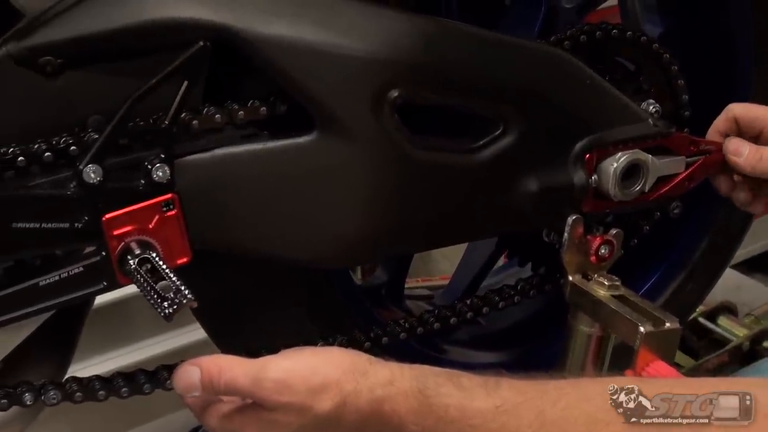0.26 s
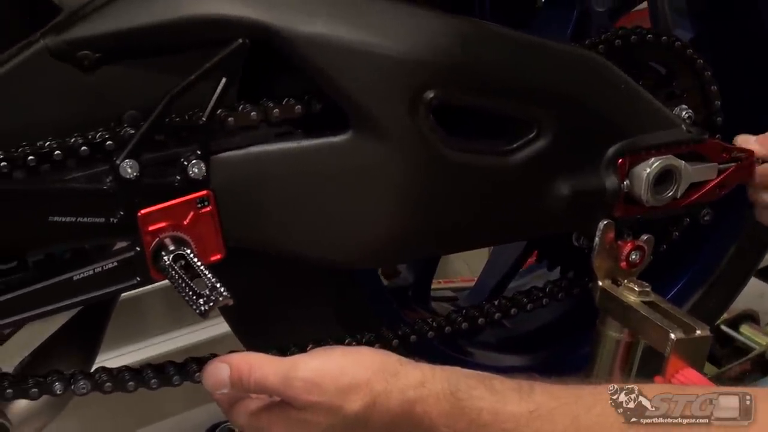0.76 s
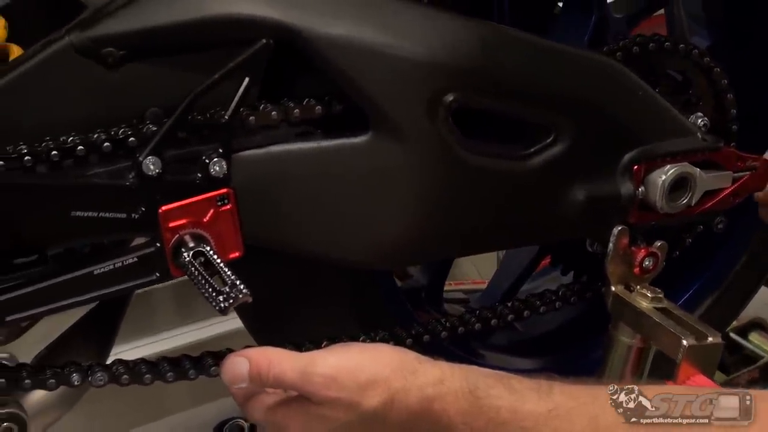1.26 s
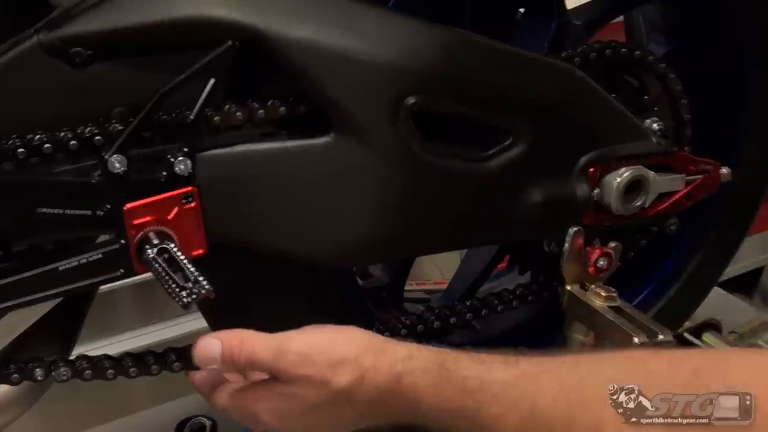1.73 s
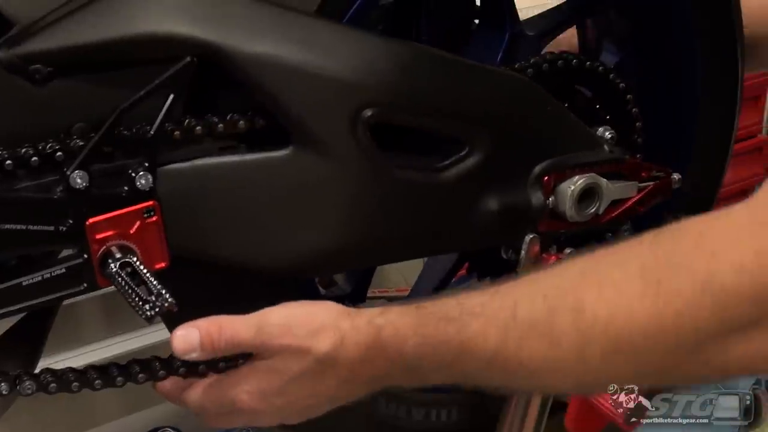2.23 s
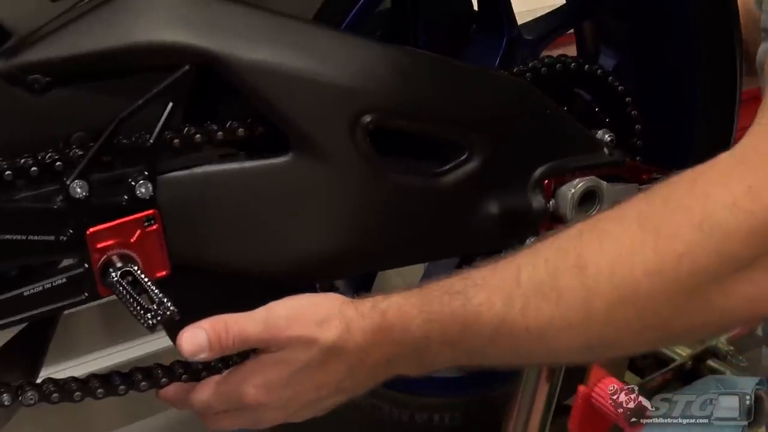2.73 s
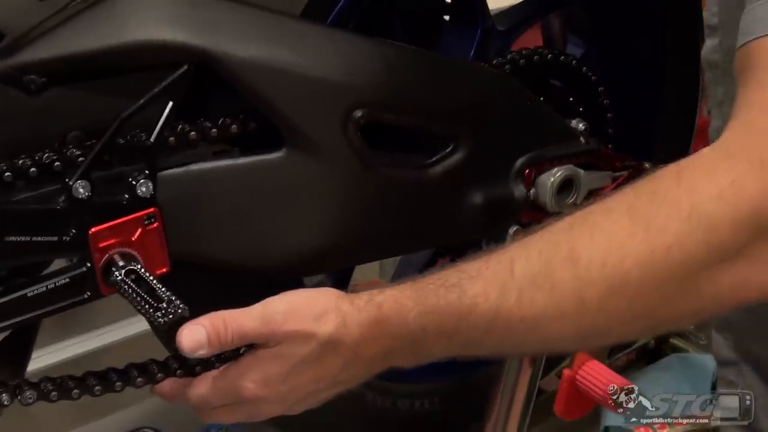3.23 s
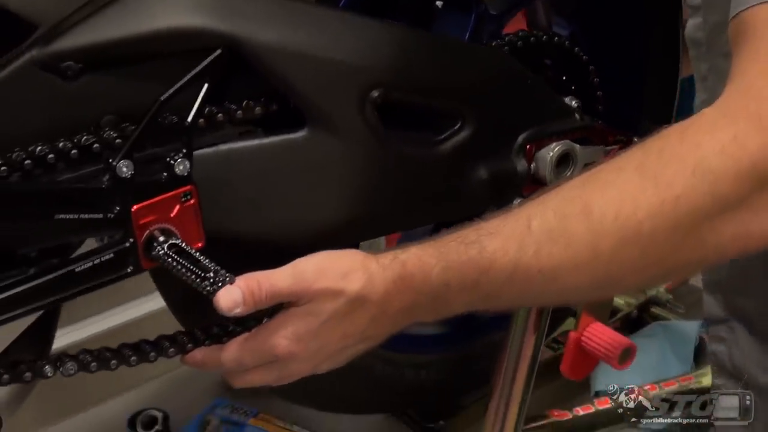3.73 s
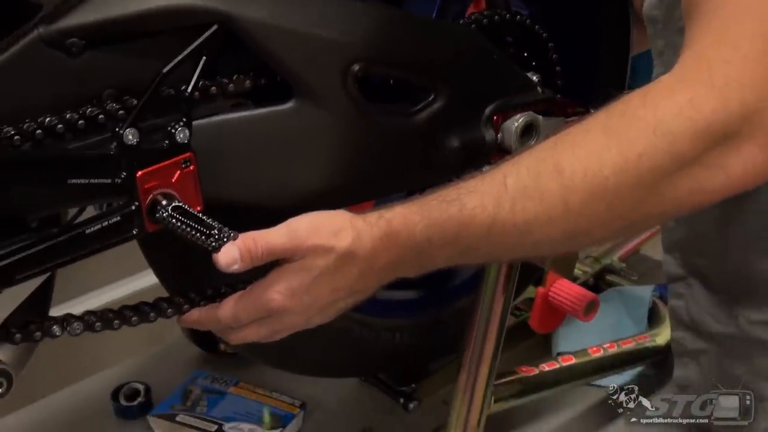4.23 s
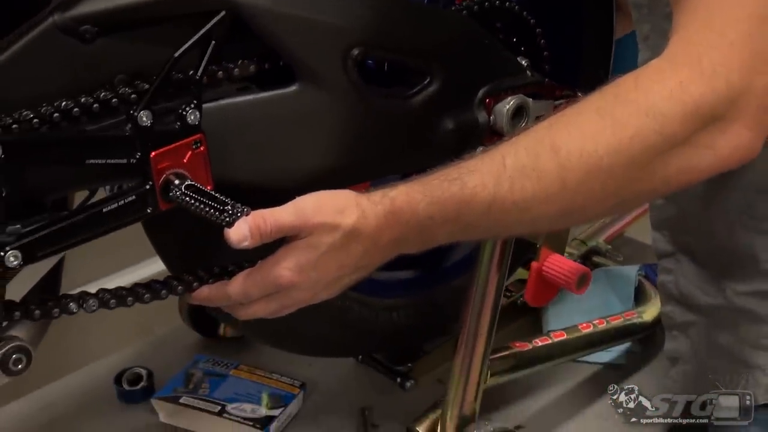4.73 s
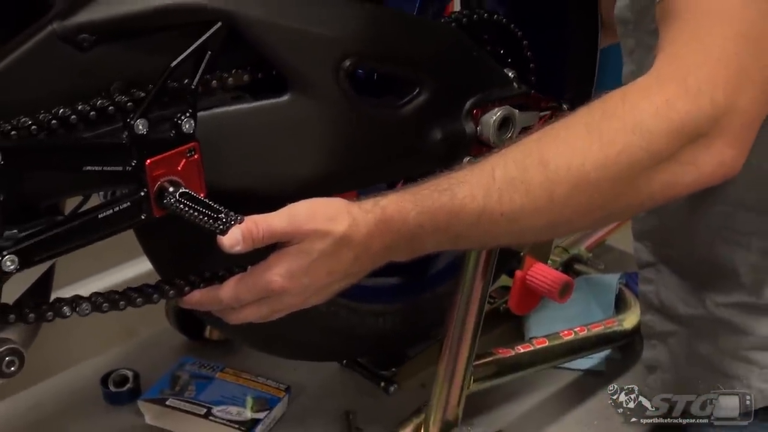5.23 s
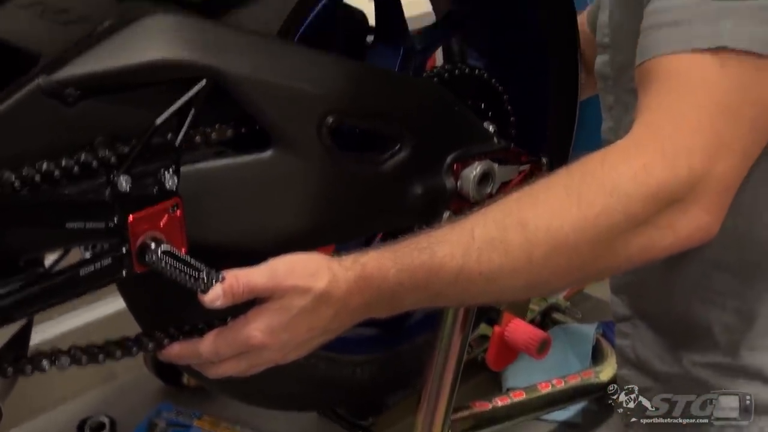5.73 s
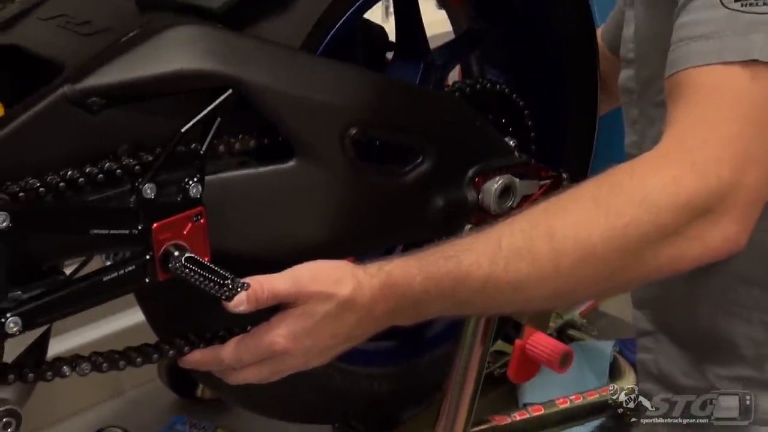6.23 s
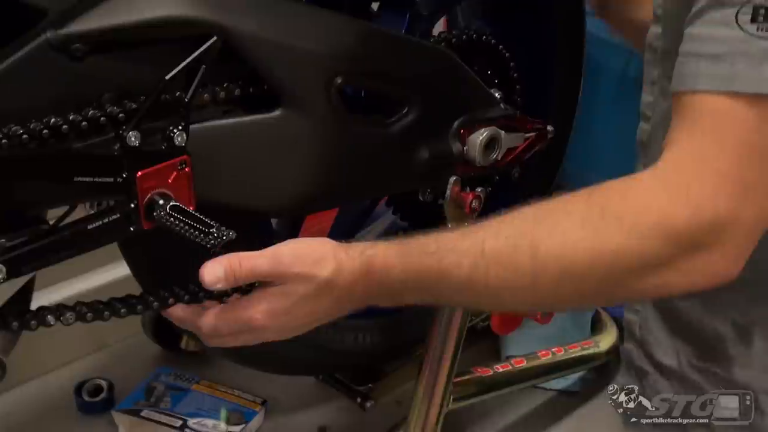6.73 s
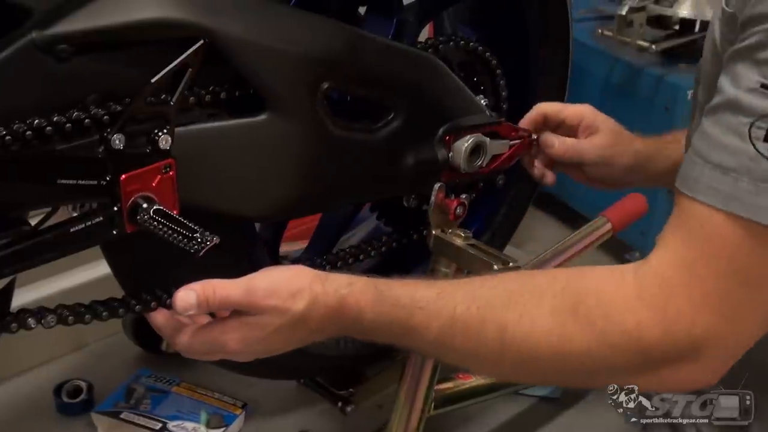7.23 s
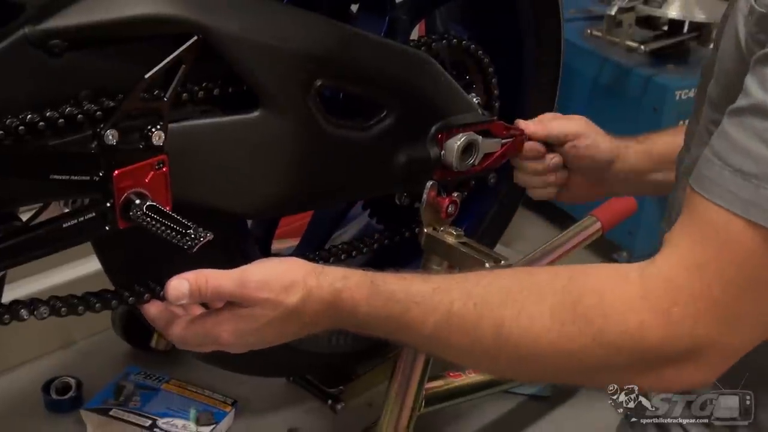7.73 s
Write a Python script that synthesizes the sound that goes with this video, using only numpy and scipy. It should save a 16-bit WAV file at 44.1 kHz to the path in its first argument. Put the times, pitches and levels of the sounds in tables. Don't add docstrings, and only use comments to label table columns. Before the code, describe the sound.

Sharp metallic ratchet snaps, then cloth rustle, paired chain and axle clacks, and three softer snaps, ringing in a large hard-walled workshop over low rumble.

```python
import sys
import numpy as np
from scipy import signal
from scipy.fft import rfft, irfft, next_fast_len
from scipy.io import wavfile
from scipy.ndimage import uniform_filter1d, map_coordinates

SR = 44100
rng = np.random.default_rng(int(sys.argv[2]) if len(sys.argv) > 2 else 0)


def level_to_linear(level):
    exponent = np.asarray(level, float) / 20
    return 10 ** exponent


def pcm_store(signal):
    levels = np.round(np.clip(np.atleast_2d(signal), -1, 1) * 32767)
    wavfile.write(sys.argv[1], SR, levels.astype(np.int16).T)


N = 351477

# (time [s], blow energy [dB], low ring [dB], brightness [dB], chatter t60 [s])
SHOVE_BLOWS = [
    (3.5402, 7, -23, -19, 0.016),
    (3.7296, 6.5, -20, -17, 0.02),
    (5.3096, 6.5, -17.5, -17.5, 0.025),
    (5.4997, 7.5, -21.5, -19.5, 0.015),
    (5.7160, -40, -12, -14.5, 0.044),
    (6.0918, 5.5, -19, -16.5, 0.022),
    (6.1979, 8, -17, -16, 0.017),
    (6.2960, -9.5, -16.5, -40, .013),
]
# (time [s], blow energy [dB], low ring [dB], brightness [dB], chatter t60 [s])
STAND_BLOWS = [
    (4.488, 4.9, -17.5, -19, 0.035),
    (4.5520, 1.7, -11.5, -13.5, 0.026),
]


def unit(x):
    return x / np.sqrt(np.mean(x ** 2) + 1e-20)


def along(points, hz):
    f, v = np.transpose(points)
    return np.interp(np.log(hz + 1), np.log(f + 1), v)


def wobble(rate):
    knots = rng.standard_normal(int(N * rate / SR) + 4)
    return map_coordinates(knots, [np.arange(N) * rate / SR])


def filtered(x, response):
    m = next_fast_len(len(x) + 8192)
    return irfft(rfft(x, m) * response(np.fft.rfftfreq(m, 1 / SR)), m)[:len(x)]


def noise(spectrum):
    return unit(filtered(rng.standard_normal(N), lambda hz: level_to_linear(along(spectrum, hz))))


def decay(since, build_s, t60):
    return (1 - np.exp(-(since / build_s) ** 2)) * level_to_linear(-60 * since / t60)


def burst(envelope, colour):
    n = len(envelope)
    spikes = rng.standard_normal(n) * level_to_linear(2.5 * rng.standard_normal(n))
    z = rfft(envelope * spikes)
    even = np.sqrt(np.abs(uniform_filter1d(np.abs(z) ** 2, size=60))) + 1e-12
    sound = irfft(z / even * colour, n)
    sound = sound * np.minimum(1, 8 * np.sqrt(envelope) + (np.cumsum(envelope) > 1))
    sound[n * 7 // 8:] = 0
    return sound / np.linalg.norm(sound)


def damped_body(modes, f):
    spot_db = rng.normal(0, 2.5, len(modes))
    response = 0
    for k, (centre, width, peak_db) in enumerate(modes):
        mode = 1j * f * width / (centre * centre - f * f + 1j * f * width)
        response = response + (-1) ** k * level_to_linear(peak_db + spot_db[k]) * mode
    return response


def free_ringing(rings, tilt, since):
    ring = np.zeros(len(since))
    for hz, level_db, t60 in rings:
        swell = (1 - np.exp(-since / 0.0013)) * level_to_linear(level_db + along(tilt, hz) - 60 * since / t60)
        drift = rng.uniform(0, 2 * np.pi) + np.cumsum(rng.normal(0, 0.07, len(since)))
        ring = ring + swell * np.sin(2 * np.pi * hz * since + drift)
    return ring


def hall():
    # (frequency [Hz], t60 [s])
    hall_t60 = [(200, 1.1), (800, 1.056), (3000, 1.35), (5000, 1.184), (7000, 0.82), (10000, .65),
                (13000, 0.59), (16000, 0.45)]
    hz, t, z = signal.stft(rng.standard_normal(int(1.3 * SR)), SR, nperseg=256)
    tail = signal.istft(z * level_to_linear(-60 * t / along(hall_t60, hz)[:, None]), SR, nperseg=256)[1]
    tail = tail * (1 - np.exp(-(np.arange(len(tail)) / SR / 0.0077) ** 2))
    return tail / np.linalg.norm(tail)


def clacks(events, body, wash, rings, usual_db, build_s, crack_db, near_db, hall_db):
    lead, short = 64, 8192
    out = np.zeros(N + 3 * SR)
    f = np.fft.rfftfreq(short, 1 / SR)
    since = np.maximum(np.arange(SR // 2) - lead, 0) / SR
    for s, db, low_db, bright_db, chatter_t60 in events:
        tilt_db = np.array([low_db, 0, bright_db, bright_db]) - usual_db
        tilt = np.transpose([[1600, 3200, 6700, 12000], tilt_db])
        broad = level_to_linear(along(tilt, f) + along(wash, f))
        bright = level_to_linear(along(tilt, f)) * damped_body(body, f)
        bright = bright + level_to_linear(crack_db) * broad * (1 + f / 9000)

        hit = burst(decay(since, build_s, chatter_t60)[:short], bright)
        bounce = burst(decay(since, 0.0033, 0.086)[:short], bright / (1 + f / 9000))
        hit = hit + level_to_linear(near_db) * bounce
        ring = 7 * chatter_t60 * free_ringing(rings, tilt, since)

        walls = hall()
        around = broad + 0.4 * np.abs(bright) / (1 + (f / 7000) ** 2)
        lumps = unit(uniform_filter1d(rng.standard_normal(len(f)), size=24))
        around = around * level_to_linear(2.4 * lumps)
        answer = filtered(walls, lambda hz: np.interp(hz, f, around))

        wet = level_to_linear(hall_db) * signal.fftconvolve(ring, walls)
        wet[:len(walls)] += level_to_linear(hall_db) * answer / np.linalg.norm(answer)
        wet[:len(ring)] += ring
        wet[:short] += hit
        out[round(s * SR) - lead:][:len(wet)] += level_to_linear(db) * wet
    return out[:N]


def adjuster():
    # (time [s], blow energy [dB], low ring [dB], brightness [dB], chatter t60 [s])
    inward_snaps = [
        (.6100, 7.5, -13.5, -17.5, .026),
        (.7726, 6, -11, -18.5, .03),
        (.8440, 10, -19.5, -18.5, .016),
        (.9564, 8.5, -16.5, -18.5, .013),
    ]
    outward_snaps = [
        (7.5933, 4.1, -7, -18, 0.018),
        (7.7169, 3.5, -5.5, -14, 0.018),
        (7.9194, 3.8, -7.5, -17, 0.022),
    ]
    # (frequency [Hz], width [Hz], level [dB])
    knob_in = [(1154, 32, -18), (1630, 120, 3), (2447, 270, -2), (3040, 240, 9), (3740, 240, -5),
               (4000, 130, -4), (6970, 130, -9), (8800, 38, -6), (11410, 310, -8.5), (12110, 220, -11.5),
               (13400, 160, 0.5), (14100, 200, -22), (16200, 150, -15.5)]
    knob_out = [(1746, 170, 0), (3800, 190, -3.5), (4100, 56, -14), (4980, 570, -5), (7160, 160, -17.5),
                (8550, 160, -13.5), (8300, 100, -12.5), (9150, 260, -8.5), (9560, 140, -13.5),
                (11000, 100, -6.5), (12600, 88, -13), (13540, 190, -8.5), (13900, 400, -23.5)]
    # (frequency [Hz], density [dB per Hz])
    wash_in = [(150, -43), (250, -11.5), (955, -17.5), (1140, -9.5), (1310, -17), (1640, -4), (3230, -5.5),
               (3840, -7.5), (4190, -1.5), (5350, -20), (6820, -9), (7980, -16), (13200, -13), (15600, -27),
               (16600, -37)]
    wash_out = [(150, -41), (250, -16.5), (938, -31), (1100, -47), (1280, -26), (1850, 4.5), (2240, -10.5),
                (2960, -13), (4260, -3), (4900, -13.5), (7700, -13.5), (10500, -17), (13200, -18),
                (15600, -25), (16600, -43.5)]
    # (frequency [Hz], level [dB], t60 [s])
    axle_block = [(1155, -35, 0.28), (2160, -35.5, 0.34), (3400, -21, 0.16), (3410, -24, 0.13),
                  (4148, -24.5, 0.17), (4860, -33, 0.14), (7010, -43.5, .25)]
    swingarm = [(1168, -21, 0.15), (1824, -28.5, 0.22), (3250, -19, 0.041), (3440, -33.5, 0.19),
                (4140, -27.5, 0.046), (5170, -37.5, 0.32), (7200, -42.5, .1)]
    end_plate = [(1120, -31, 0.31), (1914, -32.5, .25), (3680, -27, 0.17), (4156, -27.5, 0.17),
                 (4320, -36, 0.26), (5351, -53, 0.12), (8656, -39.5, .2)]
    slack = clacks(inward_snaps[:2], knob_in, wash_in, axle_block, [-11.5, -0.5, -23.0, -21],
                   build_s=0.00043, crack_db=-6.5, near_db=-13, hall_db=-15.5)
    loaded = clacks(inward_snaps[2:], knob_in, wash_in, swingarm, [-11.5, 1, -23.5, -15],
                    build_s=0.00043, crack_db=-10, near_db=-11.5, hall_db=-15.0)
    outward = clacks(outward_snaps, knob_out, wash_out, end_plate, [-7, -2.0, -21, -24],
                     build_s=0.00034, crack_db=-5.5, near_db=-8.5, hall_db=-12.0)
    return slack + loaded + outward


def chain():
    # (frequency [Hz], width [Hz], level [dB])
    links = [(740, 150, -13), (1100, 50, -40), (1650, 420, -8), (2750, 25, -1.5), (3320, 850, 9),
             (3454, 310, 1.5), (4760, 83, -23), (5114, 170, 4.5), (6000, 880, -19.5), (7760, 270, -15.5),
             (8950, 120, -28.5), (11770, 87, -16), (12250, 1600, -12.5), (13200, 340, -20)]
    # (frequency [Hz], density [dB per Hz])
    links_wash = [(70, -21.5), (130, -28), (280, -16), (420, -15), (1090, -9.5), (1300, -12.5), (1720, -5),
                  (2050, -7), (3310, 2.5), (4900, -7), (5300, -8.5), (6600, -4.5), (12000, -12.5),
                  (15600, -26), (16600, -47.5)]
    # (frequency [Hz], level [dB], t60 [s])
    sprocket = [(2480, -35, 0.1), (2670, -34, .3), (3300, -35, .35), (3460, -34.5, .25), (4365, -38.5, .25),
                (4420, -33.5, .3), (4850, -32, .3), (6300, -37, .17)]
    rim = [(1677, -37, 0.42), (2560, -23.5, .2), (2880, -34.5, .25), (3400, -46, 0.49), (3640, -26, 0.43),
           (3900, -24.5, 0.23), (3920, -32, 0.31)]
    wheel = [(1750, -32, 0.36), (2466, -33.5, .2), (3230, -36, .2), (3200, -36.5, .25), (3440, -28, 0.52),
             (4200, -43.5, 0.26), (6170, -27.5, 0.33), (6900, -29.5, 0.3)]
    stand = [(1644, -48.5, 0.96), (1754, -31, 0.79), (3220, -17.5, 0.3), (3290, -24, 0.35),
             (3660, -21.5, 0.17), (4320, -45.5, 0.74)]
    out = np.zeros(N)
    for blows, rings in [(SHOVE_BLOWS[:2], sprocket), (SHOVE_BLOWS[2:5], rim), (SHOVE_BLOWS[5:], wheel)]:
        out += clacks(blows, links, links_wash, rings, [-21.5, 0, -13, -20.5],
                      build_s=0.0049, crack_db=1.0, near_db=-1, hall_db=-6.5)
    for blows, rings in [(STAND_BLOWS[:1], stand[2:]), (STAND_BLOWS[1:], stand)]:
        out += clacks(blows, links, links_wash, rings, [-17, 3.5, -15, -20.5],
                      build_s=0.0022, crack_db=-4.5, near_db=-3, hall_db=-8.0)
    return out


def frame():
    # (time [s], level [dB], t60 [s])
    soft_knocks = [
        (2.27, -66, .15),
        (2.43, -60, .15),
        (2.98, -60, .2),
        (3.2, -63, .12),
        (7.9, -64, .2),
    ]
    # (frequency [Hz], density [dB per Hz])
    thud_colour = [(40, -20), (70, -2), (110, 0.5), (170, -3.5), (300, -28.5), (500, -120)]
    knock_colour = [(80, -120), (120, -6), (150, -2), (240, -2), (330, -12), (480, -6), (700, -120)]
    t = np.arange(N) / SR
    shake, soft = np.zeros(N), np.zeros(N)
    for s, db, *_ in SHOVE_BLOWS + STAND_BLOWS:
        shake += (t > s) * level_to_linear(db - 58 - 60 * np.abs(t - s) / 0.32)
    for s, db, t60 in soft_knocks:
        soft += (1 - np.exp(-np.maximum(t - s, 0) / 0.011)) * level_to_linear(db - 60 * np.abs(t - s) / t60)
    return shake * noise(thud_colour) + level_to_linear(10.5) * soft * noise(knock_colour)


def hands():
    # (time [s], blow energy [dB], low ring [dB], brightness [dB], chatter t60 [s])
    palm_touches = [
        (.576, -19.5, -16.5, -23.5, 0.31),
        (2.404, -30.5, 2, -30, 0.099),
        (2.421, -30, -6.5, -33, 0.17),
        (3.398, -12.5, -14, -30, 0.028),
        (3.407, -14, -7.5, -25.5, .04),
        (7.545, -27, -18, -34, 0.25),
    ]
    tick_times = [
        .349,
        1.998,
        2.43,
        2.7525,
    ]
    # (blow energy [dB], low ring [dB], brightness [dB], chatter t60 [s])
    tick_blows = [(-41, -14, -26.5, 0.065), (-29, -5.5, -17, 0.11), (-27.5, -7.5, -31, 0.023),
                  (-34.5, -16.5, -28.5, .012)]
    # (frequency [Hz], width [Hz], level [dB])
    palm = [(450, 960, -8.5), (845, 940, -16), (1410, 170, -14.5), (2520, 1000, 7), (3430, 230, -4)]
    # (frequency [Hz], density [dB per Hz])
    palm_wash = [(150, -16), (500, 2.5), (1200, -1), (2200, -4), (3400, -9), (5200, -16), (9000, -28),
                 (16000, -35)]
    ticks = [(s, *blow) for s, blow in zip(tick_times, tick_blows)]
    touched = clacks(palm_touches, palm, palm_wash, [], [-12.5, -5.0, -24.0, -29.5],
                     build_s=0.009, crack_db=21.5, near_db=-6.0, hall_db=-4.0)
    ticked = clacks(ticks, palm, palm_wash, [], [-14.5, -3.0, -22.5, -23],
                    build_s=0.001, crack_db=3, near_db=-6, hall_db=-3.5)
    return touched + ticked


def sleeves():
    # (time [s], level [dB])
    rustle_level = [
        (1.8, -102),
        (1.964, -70),
        (2.152, -70.5),
        (2.406, -63),
        (2.534, -69.5),
        (2.74, -69),
        (3.4, -71.5),
    ]
    # (frequency [Hz], density [dB per Hz])
    cloth_colour = [(90, -32), (150, 2), (320, -8), (410, -5.5), (610, -8), (800, -8), (1300, -10.5),
                    (2200, -16.5), (3400, -13), (5200, -29.5), (9000, -35), (14000, -61)]
    t = np.arange(N) / SR
    s, db = np.transpose(rustle_level)
    reach = (t > s[0]) & (t < s[-1])
    return reach * level_to_linear(np.interp(t, s, db) + 2.0) * unit(level_to_linear(1.2 * wobble(21)) * noise(cloth_colour))


def ventilation():
    # (time [s], swell of the deep rumble [dB], width [s])
    weight_shifts = [
        (.01, 20, 0.037),
        (1.59, 12.5, 0.065),
        (2.2, 9, .1),
        (3.06, 4.5, 0.088),
        (5.3, 14, 0.066),
        (5.43, 19.5, 0.065),
        (6.2, 17.5, 0.099),
        (6.49, 18.5, 0.089),
    ]
    # (frequency [Hz], level [dB])
    mains_tones = [(59.2, -63.5), (118.4, -72.5)]
    # (frequency [Hz], density [dB per Hz])
    deep_colour = [(12, -31.5), (24, -4), (33, -6.5), (42, -4), (52, -14.5), (65, -41.5), (120, -120)]
    duct_colour = [(26, -26), (45, -0.5), (72, 3), (92, -14.5), (107, -11), (167, -8.5), (230, -35.5),
                   (300, -57.5), (510, -120)]
    fan_colour = [(140, -120), (152, -9), (164, 1), (176, -13.5), (190, -120)]
    t = np.arange(N) / SR
    hum = sum(level_to_linear(db) * np.sqrt(2) * np.sin(2 * np.pi * hz * t) for hz, db in mains_tones)
    hum = hum * level_to_linear(1.8 * wobble(4.4))
    swell_db = sum(db * np.exp(-((t - s) / width) ** 2) for s, db, width in weight_shifts)
    deep = level_to_linear(-59 + swell_db) * noise(deep_colour) * level_to_linear(1.5 * wobble(7.7))
    duct = level_to_linear(-60.5) * noise(duct_colour) * level_to_linear(1.8 * wobble(5.5))
    return deep + duct + hum + level_to_linear(-72) * noise(fan_colour)


def background_hiss():
    # (frequency [Hz], density [dB per Hz])
    shared_colour = [(120, -37.5), (200, -4), (317, -8), (348, -4.5), (389, -8), (628, -12), (784, -9.5),
                     (860, -11.5), (1700, -21), (14800, -25), (16500, -39.5)]
    opposite_colour = [(30, -8.5), (200, 0), (2000, -5.5), (15000, -1.5), (15900, -6.5), (16500, -26)]
    hiss_db = -67
    opposite = level_to_linear(hiss_db - 7.5) * noise(opposite_colour)
    return level_to_linear(hiss_db) * noise(shared_colour) + opposite * [[1], [-1]]


def overload():
    # (time [s], level [dB])
    offset_step = (.8447, -21)
    start_s, step_db = offset_step
    since = np.maximum(np.arange(N) / SR - start_s, 0)
    drain = np.exp(-69 * since) * np.cos(150 * since + 0.97) + 1.3 * np.exp(-since / 0.0014)
    return -level_to_linear(step_db) * (1 - np.exp(-since / 0.00015)) * drain


def scene():
    return np.tile(adjuster() + chain() + frame() + hands() + sleeves() + ventilation(), (2, 1))


def band_limit(x):
    return signal.sosfilt(signal.butter(12, 16970, fs=SR, output="sos"), x)


def record(dry):
    upset = overload() * level_to_linear([[-6], [0]])
    limit = signal.butter(16, 16250, fs=SR, output="sos")
    return band_limit(signal.sosfilt(limit, dry + background_hiss() + upset))


dry = scene()
out = record(dry)
pcm_store(out)
```